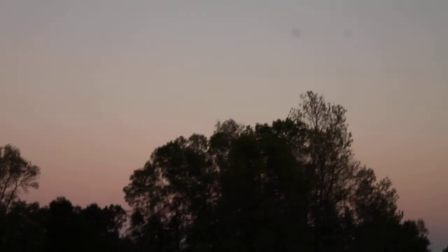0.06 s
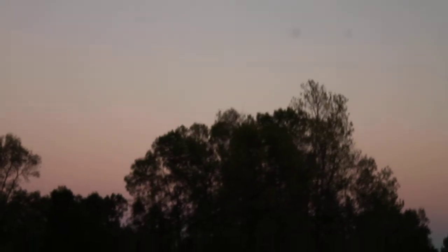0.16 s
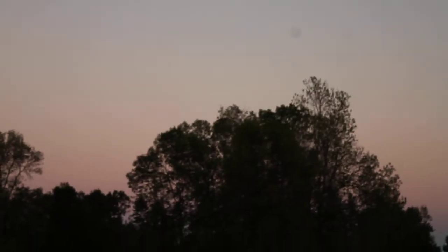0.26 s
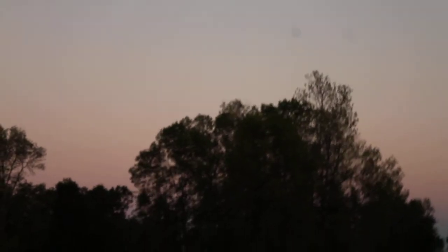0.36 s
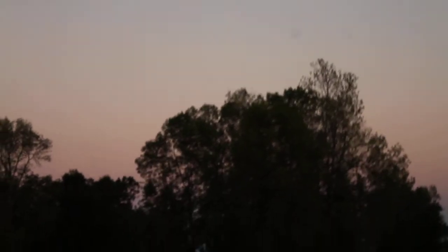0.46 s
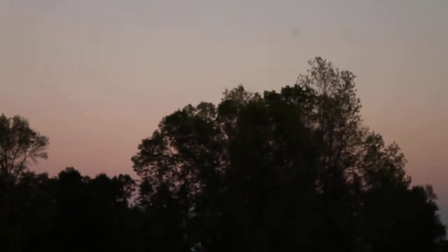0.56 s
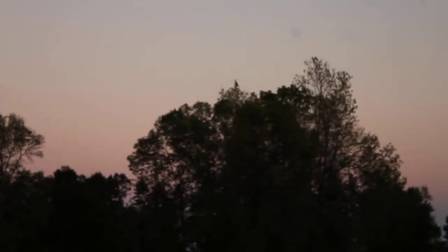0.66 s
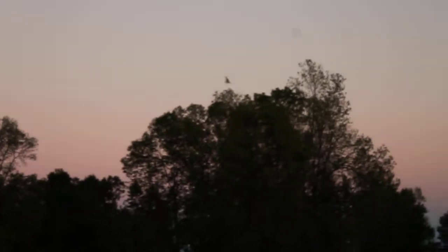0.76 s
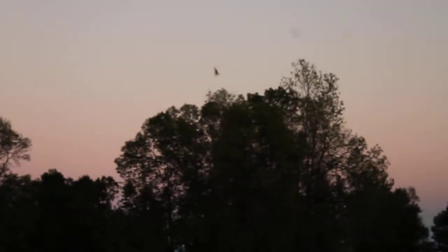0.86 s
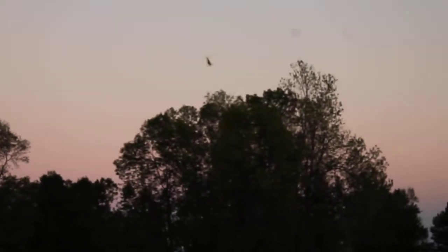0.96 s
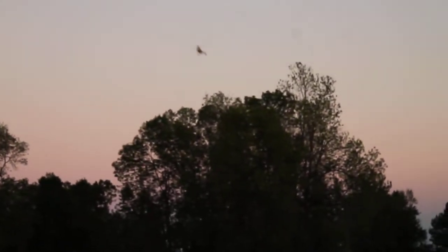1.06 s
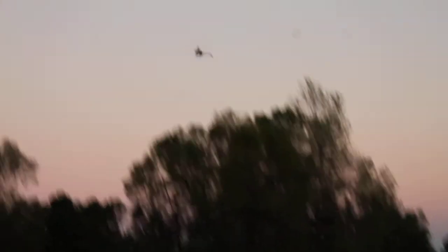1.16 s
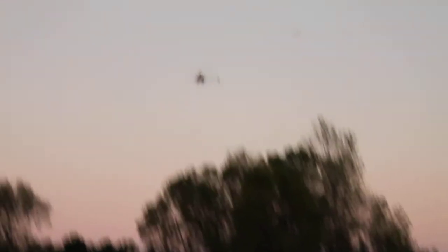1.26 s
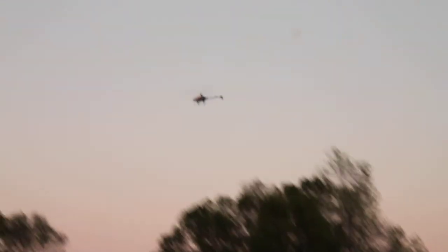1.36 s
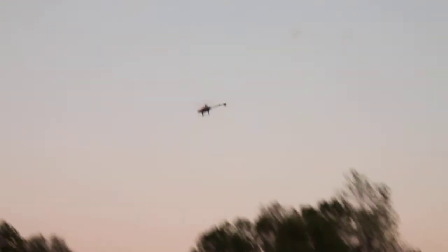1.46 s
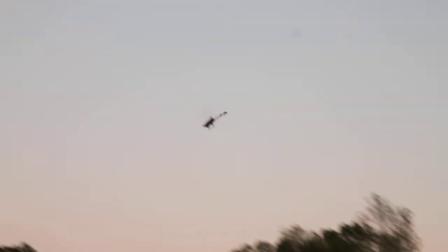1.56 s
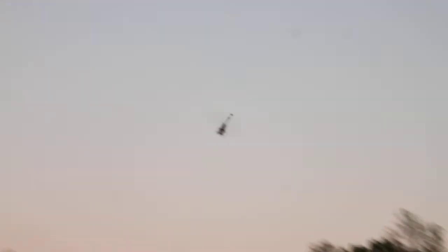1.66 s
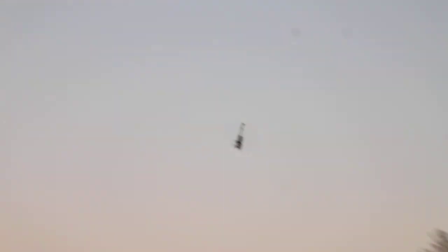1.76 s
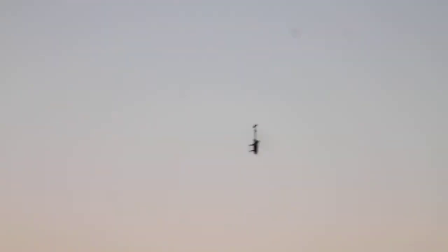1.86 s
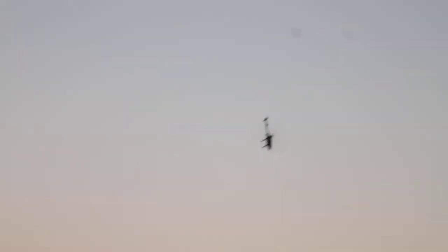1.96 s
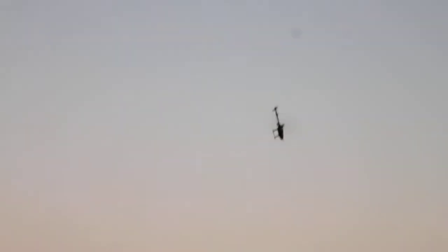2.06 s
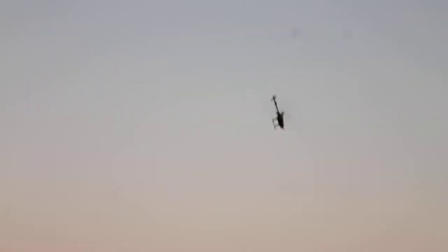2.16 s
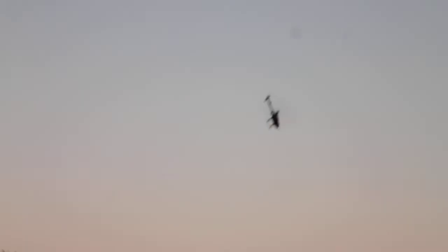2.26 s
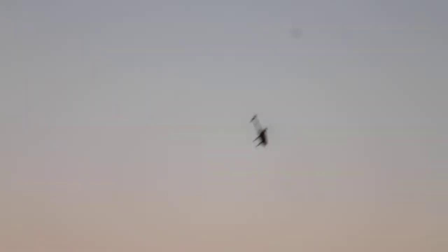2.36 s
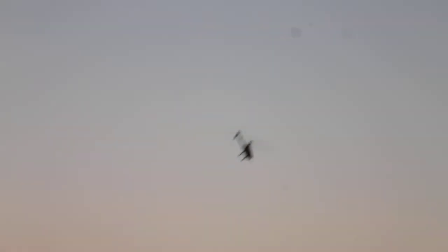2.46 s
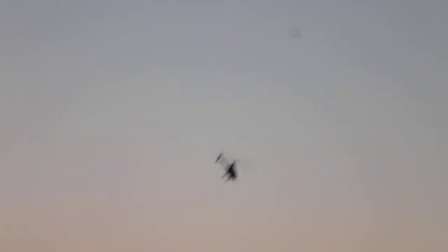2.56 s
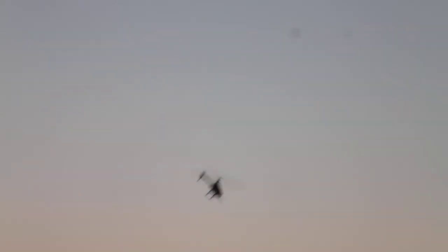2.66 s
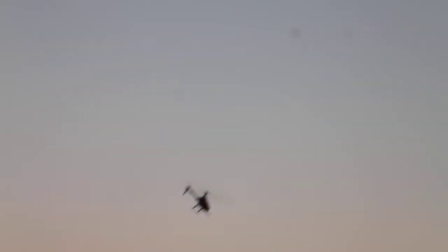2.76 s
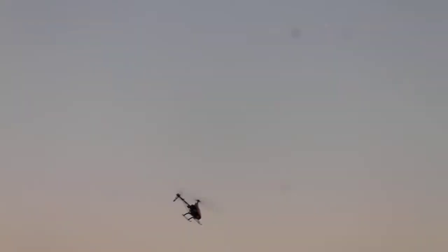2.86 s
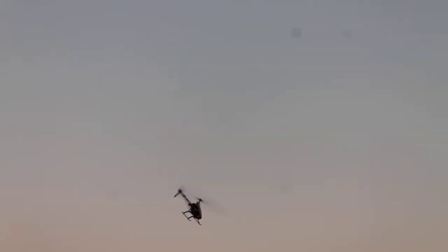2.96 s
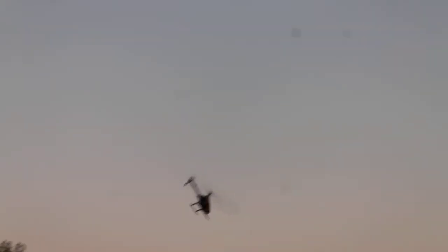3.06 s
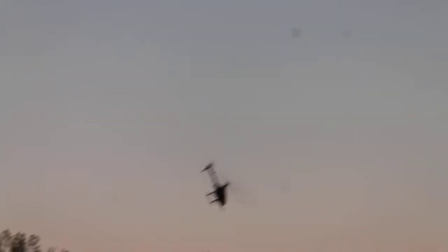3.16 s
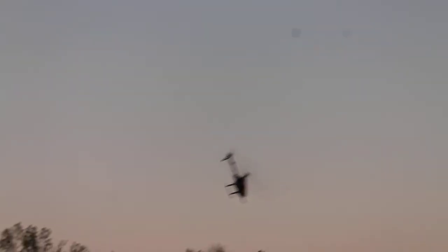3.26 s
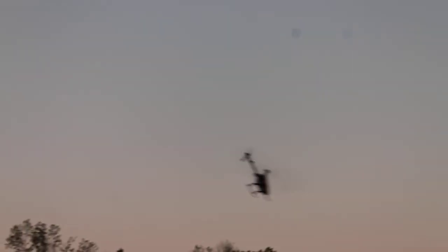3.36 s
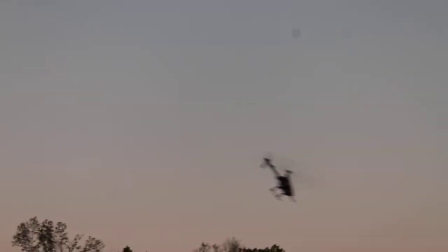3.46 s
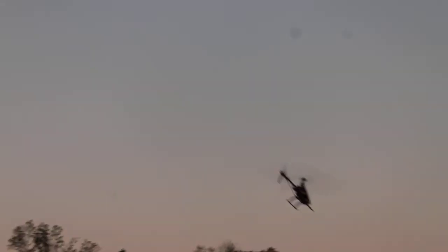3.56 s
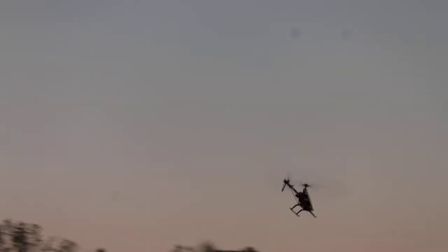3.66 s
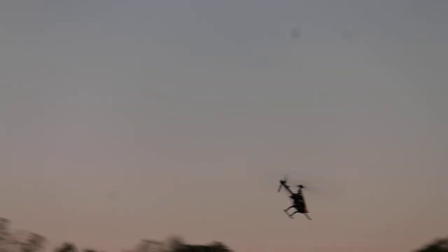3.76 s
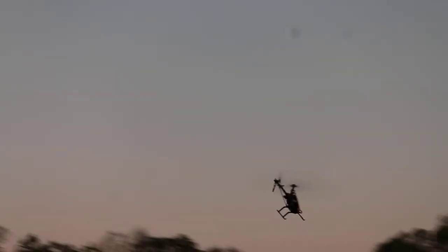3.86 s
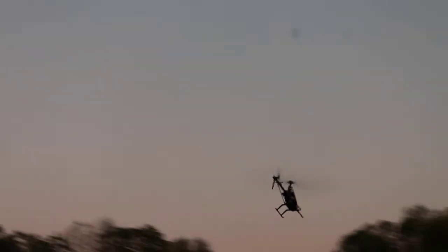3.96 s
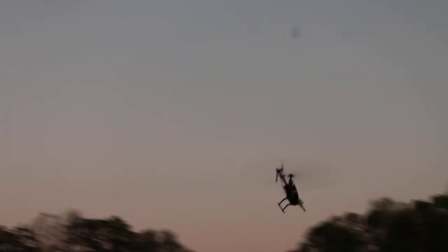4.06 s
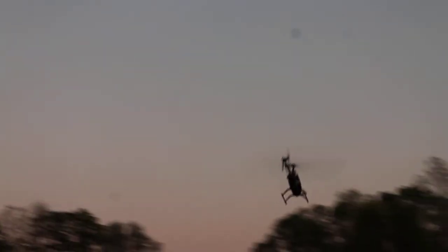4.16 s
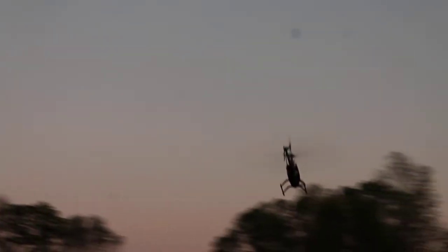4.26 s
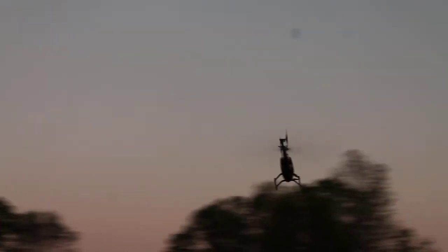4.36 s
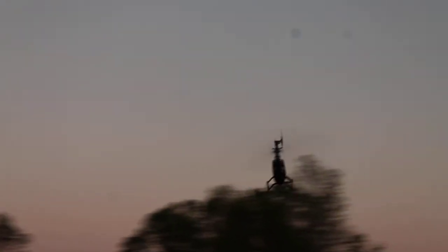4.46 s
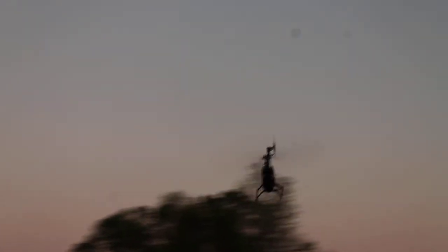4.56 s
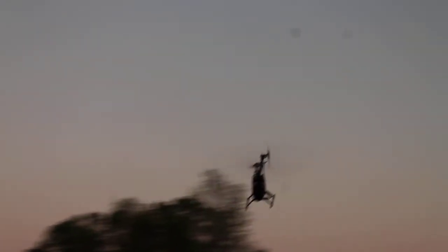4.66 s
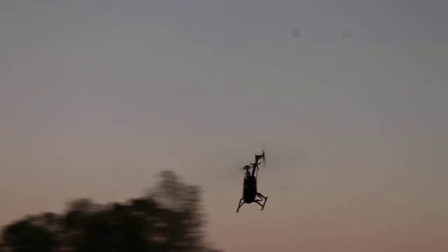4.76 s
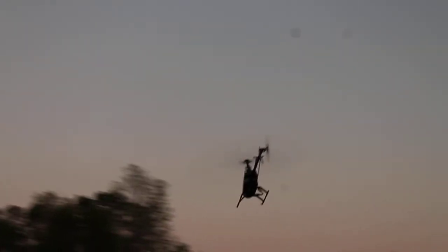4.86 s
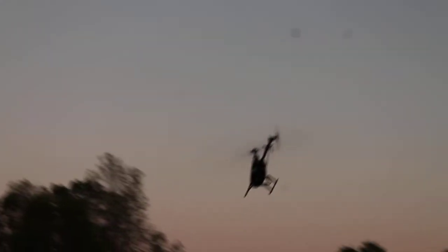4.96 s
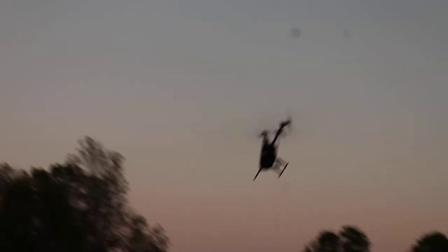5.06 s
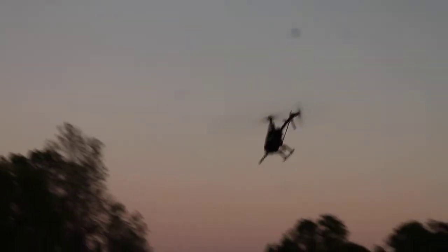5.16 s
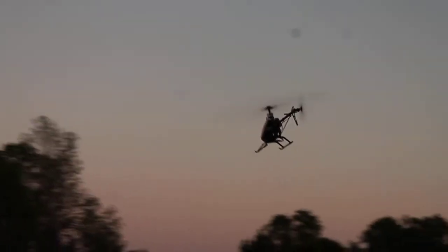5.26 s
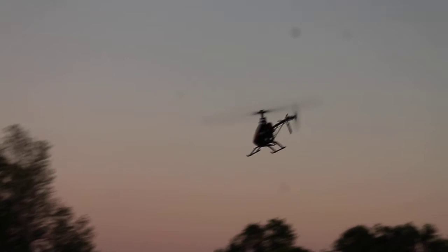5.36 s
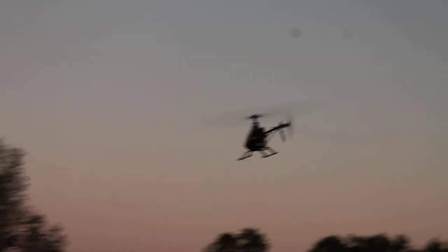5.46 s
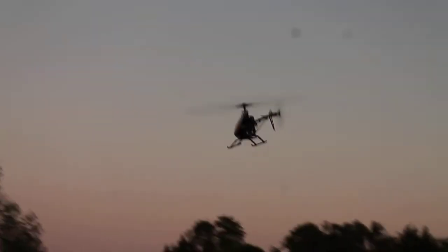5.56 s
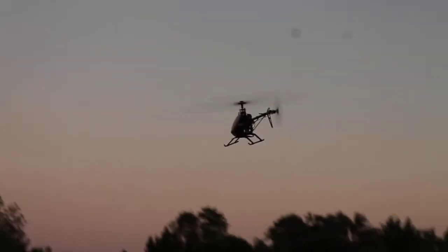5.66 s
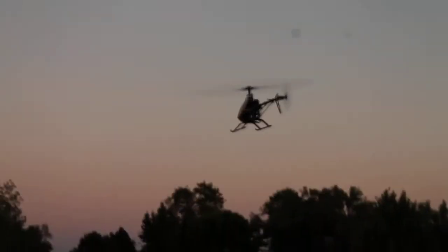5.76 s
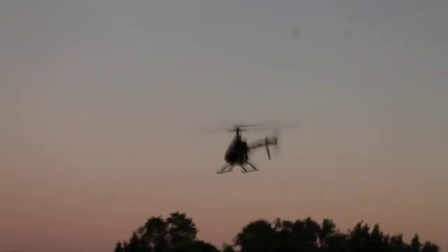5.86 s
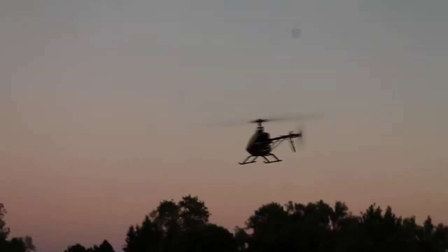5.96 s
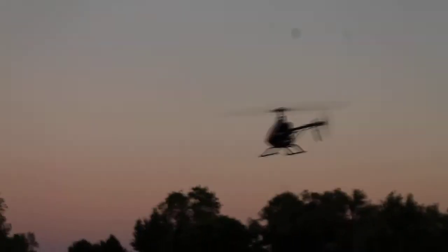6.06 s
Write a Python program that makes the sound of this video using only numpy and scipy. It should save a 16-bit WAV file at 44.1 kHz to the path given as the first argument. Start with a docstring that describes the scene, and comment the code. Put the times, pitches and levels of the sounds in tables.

```python
"""Over an open field edged by trees, an electric model helicopter comes in, banks hard and slows as it nears.
One shaft rotation drives every tone: main-rotor thrum, tail-rotor hum, and gear and motor whines near 7 kHz.
Turbulent noise, chopped at blade passage, rushes off the rotor; loaded blades slap as short paired pulses.
The tree line returns a faint diffuse echo, a low rumble lies beneath, and one dull knock lands near the microphone."""
import sys
import numpy as np
from scipy import signal
from scipy.fft import rfft, irfft, next_fast_len
from scipy.io import wavfile
from scipy.ndimage import uniform_filter1d, map_coordinates

SR = 44100
rng = np.random.default_rng(int(sys.argv[2]) if len(sys.argv) > 2 else 0)


def transcribe(u):
    """Save the signal u as a 16-bit wav file named by the first command-line argument.

    u: samples, shape (n,) or (channels, n), limited to [-1, 1]; the rate is SR.
    q: integer samples, one column per channel.
    """
    v = np.clip(np.atleast_2d(u).T, -1, 1)
    q = np.round(v * 32767).astype(np.int16)
    wavfile.write(sys.argv[1], SR, q)


N = 269451  # length in samples

# cycles per main-rotor turn: gear-tooth passage, motor shaft, tail-rotor shaft
TEETH = 162
MOTOR = 162 / 13
TAIL = 4.677


def amp(db):
    """Decibel law: a level in dB as an amplitude ratio."""
    return 10 ** (np.asarray(db) / 20)


def unit(x):
    """Normalization: x scaled to an rms of 1."""
    return x / np.sqrt(np.mean(x ** 2) + 1e-20)


def along(points, hz):
    """Interpolation of (f/Hz, value) points on a logarithmic frequency axis."""
    f, v = np.transpose(points)
    return np.interp(np.log(hz + 1), np.log(f + 1), v)


def curves(rows):
    """Linear interpolation in time: one curve for each column after t/s."""
    times, *columns = np.transpose(rows)
    return [np.interp(np.arange(N) / SR, times, column) for column in columns]


def swing(rows):
    """Relative level: a curve in dB about its own median."""
    db = curves(rows)[0]
    return db - np.median(db[::100])


def level(db, *laws):
    """Gain law: a resting level plus (control, dB per unit of that control) pairs."""
    return amp(db + sum(control * slope for control, slope in laws))


def gesture(start, length, attack, release):
    """Envelope 0-1: linear rise, hold until the length is over, exponential decay; times in s."""
    t = np.arange(N) / SR - start
    return np.clip(t / attack, 0, 1) * np.exp(-np.maximum(t - length, 0) / release)


def wobble(rate):
    """Slow random modulation: a smooth curve through random knots, rate of them a second."""
    knots = rng.standard_normal(int(N * rate / SR) + 4)
    return map_coordinates(knots, [np.arange(N) * rate / SR])


def filtered(x, response):
    """Linear filtering: the spectrum of x times a response of frequency."""
    size = next_fast_len(N + SR // 2)
    return irfft(rfft(x, size) * response(np.fft.rfftfreq(size, 1 / SR)), size)[:N]


def rush(spectrum, patchy_db):
    """Turbulence: shaped random noise of rms 1, patchy in time and frequency."""
    z = signal.stft(rng.standard_normal(N), nperseg=512)[2]
    patches = uniform_filter1d(rng.standard_normal(z.shape), size=4, axis=0)
    patches = uniform_filter1d(patches, size=20, axis=1)
    noise = signal.istft(z * amp(patchy_db * unit(patches)), nperseg=512)[1][:N]
    return unit(filtered(noise, lambda hz: amp(along(spectrum, hz))))


def pulse(spectrum, size=1024):
    """Minimum phase: the most compact causal pulse with this spectrum, peak 1."""
    cepstrum = irfft(np.log(amp(along(spectrum, np.fft.rfftfreq(size, 1 / SR)))))
    # folding the cepstrum onto positive time makes the pulse causal
    cepstrum[1:size // 2] *= 2
    cepstrum[size // 2 + 1:] = 0
    shape = irfft(np.exp(rfft(cepstrum)))
    return shape / np.abs(shape).max()


def partial(turns, order, fade_db, drift, rate):
    """Shaft-locked tone: moving air and attitude make its level (dB) and phase (rad) wander."""
    knots = np.arange(0, N + 256, 256)
    fade, lag = [map_coordinates(rng.standard_normal(int(N * rate / SR) + 4), [knots * rate / SR])
                 for _ in range(2)]
    gain = np.interp(np.arange(N), knots, amp(fade_db * fade))
    phase = np.interp(np.arange(N), knots, drift * lag)
    return unit(gain * np.sin(2 * np.pi * (order * turns + rng.random()) + phase))


def chord(turns, orders, levels_db, fade_db, drift, rate):
    """Superposition: several shaft-locked tones, together of rms 1."""
    lines = [amp(db) * partial(turns, order, fade_db, drift, rate) for order, db in zip(orders, levels_db)]
    return unit(sum(lines))


# main rotor speed as heard, Doppler shift included: t/s, speed/turns per second
ROTOR_SPEED = [(0, 43.69), (.3, 43.67), (.55, 44.17), (.8, 44.08), (1.15, 43.78), (1.35, 44.36),
               (1.56, 44.29), (1.73, 44.72), (2, 44.98), (2.17, 44.99), (2.58, 44.43), (2.88, 44.4),
               (3.1, 43.77), (3.28, 43.38), (3.68, 43.65), (3.97, 43.62), (4.15, 43.29), (4.33, 43.1),
               (4.62, 43.13), (5, 42.85), (5.3, 42.5), (5.47, 42.49), (5.78, 42.97), (6.11, 42.59)]
# blade-tip hiss, followed by the air noise about its median: t/s, level/dB
TIP_LEVEL = [(0.0, -45), (1.1, -42.5), (1.19, -37.5), (1.26, -32), (1.5, -31), (1.77, -27), (1.9, -29.5),
             (3.08, -26.5), (3.28, -23), (3.64, -30), (3.69, -29.5), (4.17, -30), (4.68, -28.5),
             (4.73, -27.5), (5.26, -27), (6.11, -28.5)]
# the pilot pulls pitch and loads the blades: t/s, length/s, load 0-1, added chop 0-1
PITCH_PULLS = [(1.44, 0.28, 0.93, 0.2), (1.693, .52, 0.83, 0.4), (3.093, 0.14, 0.92, 0.49),
               (3.308, 0.18, 0.5, 0.47), (4.717, 0.73, 0.52, 0.08), (5.795, 0.28, 0.95, 0.22)]
PULL_ATTACK_S, PULL_RELEASE_S = 0.066, 0.073
CHOP_IDLE = 0.22  # depth of the chop in level flight, 0-1
ROLL_S, ROLL_WIDTH_S = 1.41, 0.28  # middle and half length of the hard roll


def flight():
    """Kinematics: rotor turns, tip level in dB, and load, chop depth, roll and approach, each 0-1."""
    t = np.arange(N) / SR
    speed = uniform_filter1d(curves(ROTOR_SPEED)[0], size=2205)
    turns = np.cumsum(speed) / SR
    pulls = [np.outer([load, chop], gesture(start, length, PULL_ATTACK_S, PULL_RELEASE_S))
             for start, length, load, chop in PITCH_PULLS]
    load, chop = np.max(pulls, axis=0)
    depth = np.clip(CHOP_IDLE + (1 - CHOP_IDLE) * chop, 0, 1)
    roll = np.exp(-((t - ROLL_S) / ROLL_WIDTH_S) ** 2)
    return turns, swing(TIP_LEVEL), load, depth, roll, t / t[-1]


# outdoor rumble spectrum: f/Hz, density level/dB
RUMBLE_SPECTRUM = [(20, -25), (45, -20), (65, 1), (100, -4.5), (135, 4), (200, -14), (400, -2), (2000, -57)]
RUMBLE_DB, RUMBLE_CHANGE_DB = -47.5, -13  # level at first, and its change by the end


def field_rumble(approach):
    """Ambient noise: a low, patchy random rumble that sinks steadily."""
    return level(RUMBLE_DB, (approach, RUMBLE_CHANGE_DB)) * rush(RUMBLE_SPECTRUM, patchy_db=1.0)


# reverberation time of the trees: f/Hz, t60/s
TREE_DECAY = [(200, 0.69), (3000, 0.84), (12000, 1)]
# echo gain, nearly gone at mid-flight and then partly back: t/s, level/dB
ECHO_LEVEL = [(0, 0), (1.5, -1), (3, -47), (6.11, -26)]


def tree_line(x):
    """Diffuse scattering: leaves and trunks return a late echo with exponential decay."""
    hz, t, z = signal.stft(rng.standard_normal(SR), SR, nperseg=256)
    decay = amp(-60 * t / along(TREE_DECAY, hz)[:, None])
    build_up = 1 - np.exp(-t / 0.015)
    tail = signal.istft(z * decay * build_up, SR, nperseg=256)[1]
    echo = signal.fftconvolve(x, tail / np.linalg.norm(tail))[:N]
    return amp(curves(ECHO_LEVEL)[0]) * echo


# the blow: t/s, click level/dB, thump level/dB
KNOCK_BLOW = (5.811, -8, -13)
# spectrum of its thump: f/Hz, level/dB
KNOCK_THUMP = [(20, -35), (70, -14), (130, -0.5), (220, 2), (420, -6), (700, -13), (2000, -24),
               (16000, -70)]
# spectrum of its click: f/Hz, level/dB
KNOCK_CLICK = [(100, -25), (600, -15), (1400, 2), (2600, -2), (4000, -18), (16000, -45)]


def knock():
    """Impact response: a short, dull click with a heavily damped thump."""
    start, click_db, thump_db = KNOCK_BLOW
    blow = amp(thump_db) * pulse(KNOCK_THUMP) - amp(click_db) * pulse(KNOCK_CLICK)
    out = np.zeros(N)
    out[round(start * SR):][:len(blow)] = blow
    return out


# low wash off the blades: f/Hz, density level/dB
WASH_SPECTRUM = [(20, -55), (50, -27), (130, -20), (250, -2), (400, -8.5), (600, 7), (850, -10),
                 (1100, -2.5), (2000, -47)]
# middle swish: f/Hz, density level/dB
SWISH_SPECTRUM = [(400, -34), (750, -2.5), (930, 2.5), (1080, -7.5), (1300, 1.5), (1850, 1), (2350, -2.5),
                  (2900, -10), (5000, -55)]
# high hiss of the tips: f/Hz, density level/dB
HISS_SPECTRUM = [(1200, -46), (2200, -10), (2750, -0.5), (3400, 1.5), (4900, 0.5), (5700, -2), (6500, -18),
                 (9000, -55)]


def airflow(turns, tips, load, depth):
    """Amplitude modulation: air noise swells as each of two blades advances, the tip hiss most briefly."""
    advance = np.abs(np.cos(2 * np.pi * turns))
    gust = amp(1.3 * wobble(60))

    def chop(sharpness):
        """Power modulation at blade passage, narrower with greater sharpness."""
        return np.sqrt(1 - depth + depth * unit(advance ** sharpness * gust) ** 2)

    wash = level(-41.5, (tips, .4), (load, 8)) * rush(WASH_SPECTRUM, patchy_db=1.5)
    swish = level(-35, (tips, .85), (load, 6.5)) * rush(SWISH_SPECTRUM, patchy_db=1.05)
    hiss = level(-28.5, (tips, 1.06), (load, .4)) * rush(HISS_SPECTRUM, patchy_db=1.47)
    return chop(sharpness=4) * (wash + swish) + chop(sharpness=6) * hiss


# thrum and slaps follow this curve about its median: t/s, level/dB
THRUM_LEVEL = [(0.0, -57), (0.64, -53.5), (1.21, -47), (1.54, -33.5), (1.61, -37.5), (1.81, -30.5),
               (1.93, -32), (2.2, -28.5), (2.55, -34), (3.17, -40), (3.49, -32.5), (3.78, -39.5),
               (4.4, -41), (5.03, -36), (5.72, -37.5)]
# thrum partials: cycles per rotor turn
THRUM_LINES = [4, 6, TAIL + 2, 8, 10, 2 * TAIL + 2, 12, 13, 15]
# their relative strengths: level/dB
THRUM_LINE_DB = [-8, -2.5, 2, -4, -12, -26, -10.5, -1.5, -8]
# blade-pass tone, before a fixed trim: t/s, level/dB
BLADE_PASS_LEVEL = [(0.1, -63.5), (1.1, -54), (1.42, -43.5), (2.17, -55), (2.54, -48), (3.03, -58),
                    (3.53, -41.5), (3.75, -53), (4.2, -54.5), (4.33, -66), (5.0, -55), (5.24, -63),
                    (6.11, -52.5)]


def main_rotor(turns, roll, approach):
    """Rotational noise: two blades sound twice a turn, with a thrum of shaft-locked partials above."""
    blade_pass = amp(curves(BLADE_PASS_LEVEL)[0] - 0.5) * partial(turns, 2, fade_db=1.0, drift=.15, rate=6.6)
    thrum_gain = level(-39.0, (swing(THRUM_LEVEL), 1.15), (roll, 1.5), (approach, -2))
    thrum = chord(turns, THRUM_LINES, THRUM_LINE_DB, fade_db=2.5, drift=0.19, rate=4.997)
    return blade_pass + thrum_gain * thrum


# tail hum, before trims: t/s, third harmonic level/dB, second harmonic level/dB
TAIL_HUM_LEVEL = [(0.0, -42.5, -44), (0.97, -44, -38.5), (1.19, -54, -36.5), (1.4, -44, -48),
                  (1.5, -40, -33.5), (1.58, -36, -44), (1.85, -40, -38), (1.94, -26, -43),
                  (2.04, -33, -39.5), (2.91, -31.5, -38.5), (3.25, -31, -43), (3.5, -30, -38.5),
                  (4.47, -39, -45.5), (5.04, -35, -38.5), (5.78, -32, -38), (5.89, -28.5, -35),
                  (6.11, -33.5, -38)]
BITE_S, BITE_DB, BITE_ATTACK_S, BITE_DECAY_S = 1.26, -33, .04, 0.28


def tail_rotor(turns, tips, load, roll, approach):
    """Harmonic series: the tail shaft hums, and the roll shifts its strength upwards."""
    third_db, second_db = curves(TAIL_HUM_LEVEL)
    gains = [level(-45.5, (swing(THRUM_LEVEL), 1.3), (roll, -12)),
             amp(second_db + 0.34),
             amp(third_db + 0.27 - 3.0 * roll),
             level(-58.5, (approach, 20.5), (load, 2), (roll, 16))]
    hum = sum(gain * partial(turns, TAIL * (k + 1), fade_db=1, drift=0.24, rate=9)
              for k, gain in enumerate(gains))
    # the tail blades bite the main rotor's wake as the roll begins
    bite = amp(BITE_DB) * gesture(BITE_S, BITE_ATTACK_S, BITE_ATTACK_S, BITE_DECAY_S)
    upper = chord(turns, [6 * TAIL, 7 * TAIL, 12 * TAIL], [0, -14, -11], fade_db=5, drift=0.27, rate=40)
    return hum + (level(-47, (tips, .6)) + bite) * upper


def motor_unbalance(turns, load, roll, approach):
    """Rotating unbalance: the motor sounds one tone at its own shaft rate."""
    gain = level(-42.5, (approach, 3), (load, 3), (roll, -18))
    return gain * partial(turns, MOTOR, fade_db=1.5, drift=0.13, rate=8.1)


# runs of sharp slaps in the hard turns: t/s, strikes (rounded), peak level/dB, thud level/dB re crack
SLAP_RUNS = [(1.2253, 10.2, -10, -23), (1.413, 1, -8.5, -11), (1.49, 1, -19, 5), (1.556, 2, -13, -12),
             (1.65, 1, -8, -24), (2.109, 1, -18, -10), (2.164, 1, -8, -6), (2.21, 1, -13, -7),
             (3.228, 10, -14, -14), (3.422, 1, -11, -16), (3.454, 1, -8.5, -12)]
# sharp crack: f/Hz, level/dB
CRACK_SPECTRUM = [(200, -27), (700, -22.5), (1250, 6), (2000, 1), (3500, 2), (5000, -19), (9000, -20),
                  (16000, -34)]
# low thud: f/Hz, level/dB
THUD_SPECTRUM = [(25, -61), (90, -35), (200, -6), (350, -1), (700, -8.5), (1500, -14.5), (4000, -34.5),
                 (16000, -66)]


def slaps(turns, load):
    """Blade-vortex interaction: a blade strikes the vortex of the one before, a crack over a low thud."""
    stray = 0.011 * wobble(90)  # turns; the vortex drifts, so each strike comes a little early or late
    passes = np.flatnonzero(np.diff(np.floor(2 * (turns + stray))) > 0)
    cracks, thuds = np.zeros((2, N))
    gain = level(-26.0, (swing(THRUM_LEVEL), .7), (load, 1.5))
    cracks[passes] = gain[passes] * amp(1.0 * rng.standard_normal(len(passes)))
    thuds[passes] = cracks[passes] * amp(-5)
    for start, strikes, db, thud_db in SLAP_RUNS:
        count = max(round(strikes), 1)
        for k in range(count):
            at = np.searchsorted(turns, turns[round(start * SR)] + k / 2)
            nearest = passes[np.argmin(np.abs(passes - at))]
            cracks[nearest] = thuds[nearest] = 0  # the slap replaces the nearest ordinary strike
            cracks[at] = amp(db) * np.sqrt(np.sin(np.pi * (k + .5) / count))  # a run swells and fades
            thuds[at] = cracks[at] * amp(thud_db)
    crack_sound = signal.fftconvolve(cracks, pulse(CRACK_SPECTRUM))
    thud_sound = signal.fftconvolve(thuds, pulse(THUD_SPECTRUM))
    return -(crack_sound + thud_sound)[:N]


# gear whine, before trims: t/s, level/dB
MESH_LEVEL = [(0.0, -45), (0.56, -44.5), (1.29, -30.5), (1.38, -20.5), (1.5, -27), (1.84, -18.5),
              (2.09, -29), (2.47, -16), (2.81, -20.5), (3.05, -17), (3.23, -23.5), (3.79, -18),
              (4.9, -17.5), (5.45, -21.5), (5.78, -19), (5.89, -26), (5.9, -19), (6.11, -20)]
# share of the gear whine's power given to its sidebands: t/s, share 0-1
SIDEBAND_SHARE = [(0, 0.35), (.7, .1), (.9, 0.3), (1.65, 0.9), (1.95, .15), (2.75, 0.4), (3, 0.17),
                  (4.1, 0.38), (4.5, .65), (5.1, 0.73), (6.11, 0.65)]
# motor whine: t/s, level/dB
MOTOR_WHINE_LEVEL = [(0, -41.5), (.45, -52), (.6, -43.5), (1.1, -59), (1.5, -30), (2.2, -28.5), (2.45, -38),
                     (3.1, -37), (3.45, -28.5), (3.9, -20.5), (4.5, -21), (5.15, -30.5), (5.7, -28.5),
                     (6.11, -30)]
# sidebands from gear run-out and the tail drive: cycles per rotor turn
SIDEBAND_LINES = [143, 145, 147.67, 151.55, TEETH - 2 * TAIL, 156.33, TEETH - TAIL, 159, 160, 161, 163, 164,
                  166, TEETH + TAIL, 168, TEETH + MOTOR]
# their relative strengths: level/dB
SIDEBAND_DB = [-13, -5, -2.5, -19, -4, -5.5, -13, -25, 5.5, -1, -7, -3, 2, -7.5, -3, -6]
# tail drive overtones: cycles per rotor turn
TAIL_DRIVE_LINES = [16 * TAIL, 22 * TAIL, 24 * TAIL, 25 * TAIL, 27 * TAIL]
# their relative strengths: level/dB
TAIL_DRIVE_DB = [-8.5, -5, -5.5, -3, -10]
FLUTTER_TURNS, ROLL_FLUTTER_TURNS = 0.00023, 0.00081  # backlash in level flight, and what the roll adds


def whines(play, turns, tips):
    """Gear meshing: tooth passage and motor poles whine, and run-out adds sidebands."""
    mesh_db, motor_db = curves(MESH_LEVEL)[0], curves(MOTOR_WHINE_LEVEL)[0]
    share = np.clip(curves(SIDEBAND_SHARE)[0], 0, 1)
    mesh = amp(mesh_db - 1.5) * np.sqrt(1 - share) * partial(play, TEETH, fade_db=0.7, drift=0.2, rate=11)
    mesh *= 1 + 0.31 * np.cos(2 * np.pi * turns)  # the main gear runs slightly off centre
    motor = amp(motor_db) * partial(play, TEETH - MOTOR, fade_db=1.7, drift=0.33, rate=15)
    sidebands = chord(play, SIDEBAND_LINES, SIDEBAND_DB, fade_db=-0.2, drift=0.42, rate=6)
    sidebands *= amp(mesh_db - 0.6) * np.sqrt(share)
    drive = chord(turns, TAIL_DRIVE_LINES, TAIL_DRIVE_DB, fade_db=-2.0, drift=1.0, rate=4.3)
    return mesh + motor + sidebands + level(-37.5, (tips, .95)) * drive


# gearbox treble, followed by rasp and squeal about its median: t/s, level/dB
GEAR_NOISE_LEVEL = [(0.05, -52), (0.17, -54), (1.05, -49), (1.42, -38.5), (1.54, -41.5), (1.64, -36),
                    (1.84, -36.5), (2.22, -34.5), (3.16, -33.5), (3.49, -32.5), (3.93, -36.5),
                    (4.38, -37.5), (5.53, -32), (6.05, -35)]
# rasp around the whine: f/Hz, density level/dB
RASP_SPECTRUM = [(4500, -27), (5800, -15), (6250, -3), (6600, -0.5), (7000, -1), (7300, -4), (7700, -3),
                 (8400, -14.5), (9500, -26), (12000, -42)]
# fizz above it: f/Hz, density level/dB
FIZZ_SPECTRUM = [(6000, -40), (8300, 7), (9300, 4), (11300, 2.5), (12700, 0), (14000, -8), (15000, -2),
                 (15700, -11)]
# smeared octave of the gears: f/Hz, density level/dB
SQUEAL_SPECTRUM = [(11000, -42), (12400, 3), (12900, 2), (13600, -15), (14050, 7), (14600, -6),
                   (15600, -11)]
# lines around the octave of the whines: cycles per rotor turn
OCTAVE_LINES = [24 * MOTOR, 64 * TAIL, 308, 25 * MOTOR, 312, 314, 316, 320, 323, TEETH * 2, 325, 328, 27 *
                MOTOR, 28 * MOTOR]
# their relative strengths: level/dB
OCTAVE_DB = [-7, -8, -8, -7, -3, -8, -4, -6, -6, 0, -6, -4, -5, -9]


def gearbox(turns, tips, roll, approach):
    """Contact noise: tooth scatter rasps and squeals under pulsing pressure, beside the meshing whines."""
    # backlash lets the gear flutter, most in the hard roll
    play = turns + (FLUTTER_TURNS + ROLL_FLUTTER_TURNS * roll) * wobble(70)
    noise = swing(GEAR_NOISE_LEVEL)
    # the teeth press harder once and twice a turn, and with every turn of the pinion
    press = 1 + 0.069 * np.cos(2 * np.pi * turns) + 0.097 * np.cos(4 * np.pi * turns)
    press = unit(press + 0.34 * np.cos(2 * np.pi * MOTOR * turns))
    rasp = level(-25.0, (noise, 1.2)) * rush(RASP_SPECTRUM, patchy_db=2.04)
    fizz = level(-35.0, (noise, 1.15)) * rush(FIZZ_SPECTRUM, patchy_db=2.5)
    octave = chord(play, OCTAVE_LINES, OCTAVE_DB, fade_db=2.5, drift=.7, rate=16)
    smear = amp(1) * rush(SQUEAL_SPECTRUM, patchy_db=3.0)
    squeal = level(-41.5, (noise, 1.15), (approach, 8.5)) * (octave + smear)
    return whines(play, turns, tips) + press * (rasp + fizz + squeal)


def scene():
    """Superposition at one point: field, echo, knock and helicopter, alike in both channels."""
    turns, tips, load, depth, roll, approach = flight()
    bright = gearbox(turns, tips, roll, approach) + slaps(turns, load)
    background = field_rumble(approach) + tree_line(bright) + knock()
    rotors = main_rotor(turns, roll, approach) + tail_rotor(turns, tips, load, roll, approach)
    rotors += motor_unbalance(turns, load, roll, approach)
    mono = background + airflow(turns, tips, load, depth) + rotors + bright
    return np.array([mono, mono])


TOP_HZ = 15720


def record(dry):
    """Band limitation: nothing at or above the top frequency is kept."""
    return np.array([filtered(channel, lambda hz: hz < TOP_HZ) for channel in dry])


dry = scene()
out = record(dry)
transcribe(out)
```